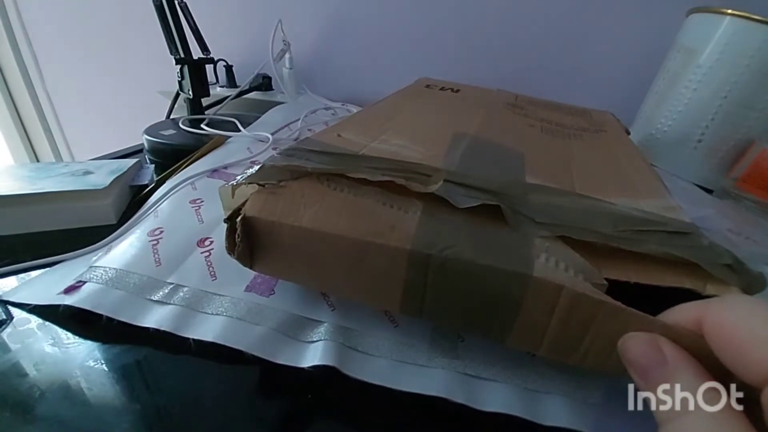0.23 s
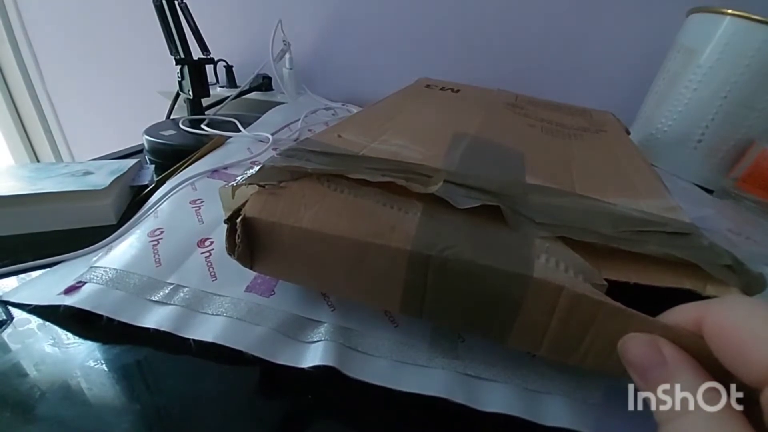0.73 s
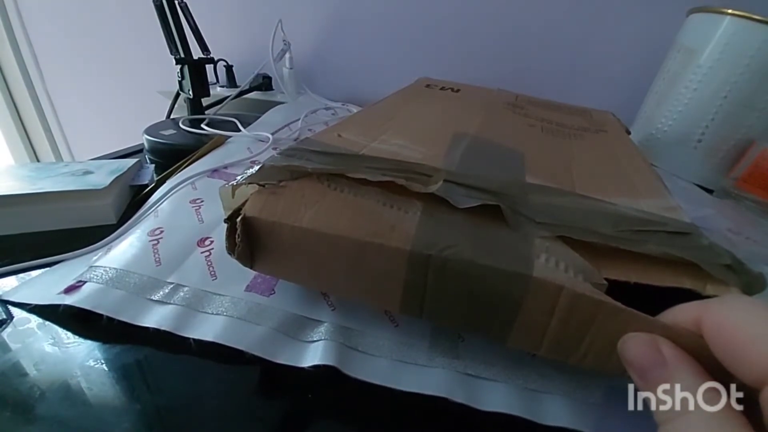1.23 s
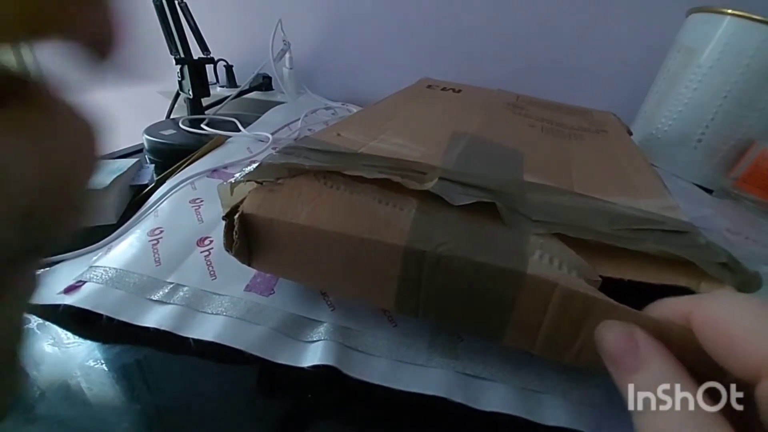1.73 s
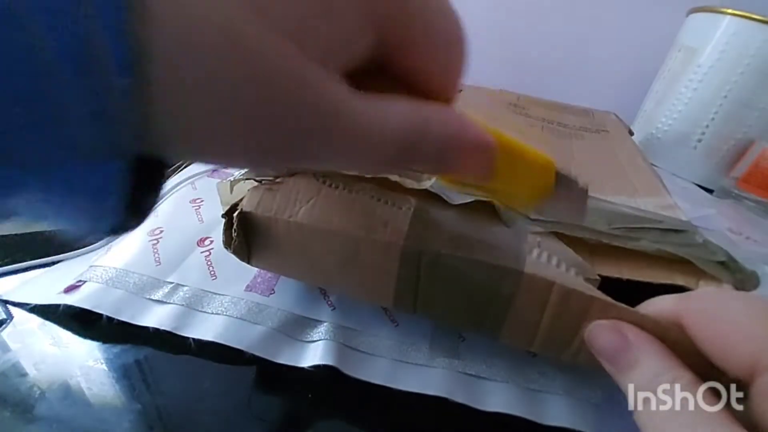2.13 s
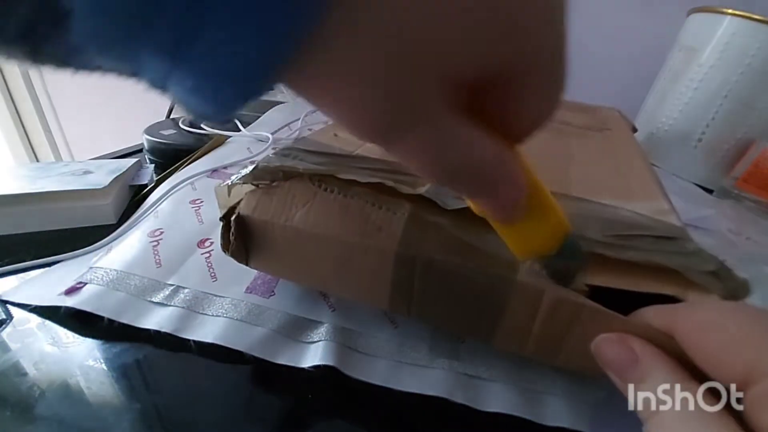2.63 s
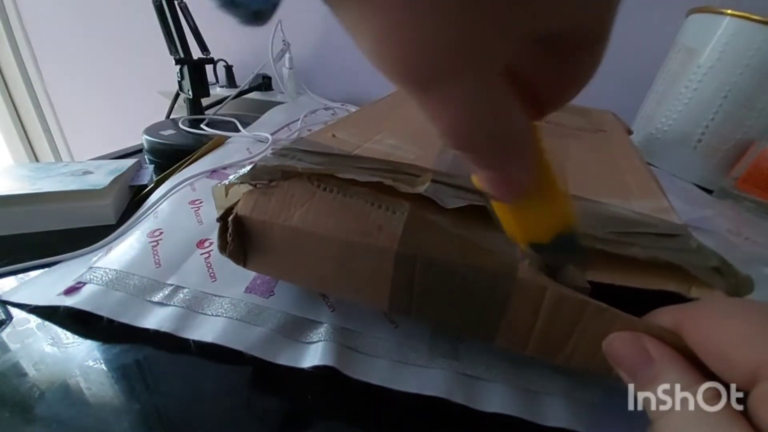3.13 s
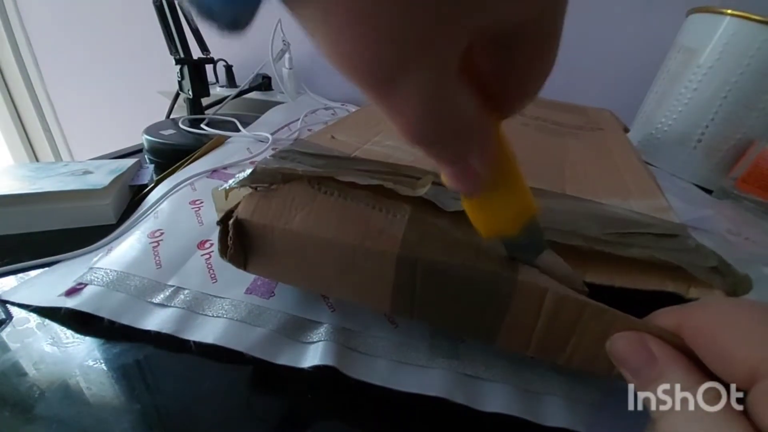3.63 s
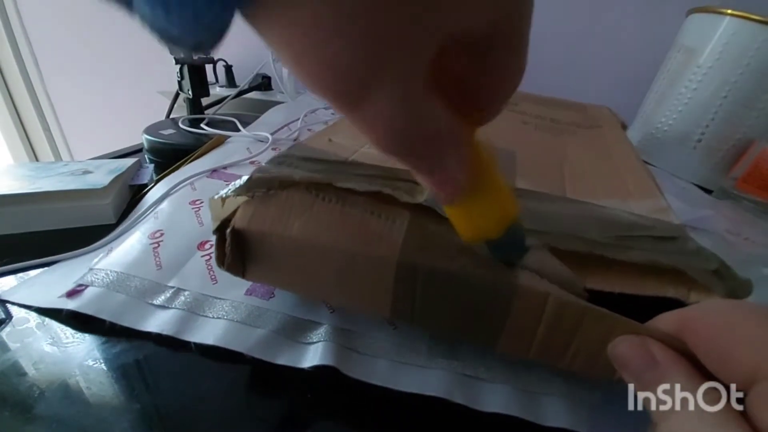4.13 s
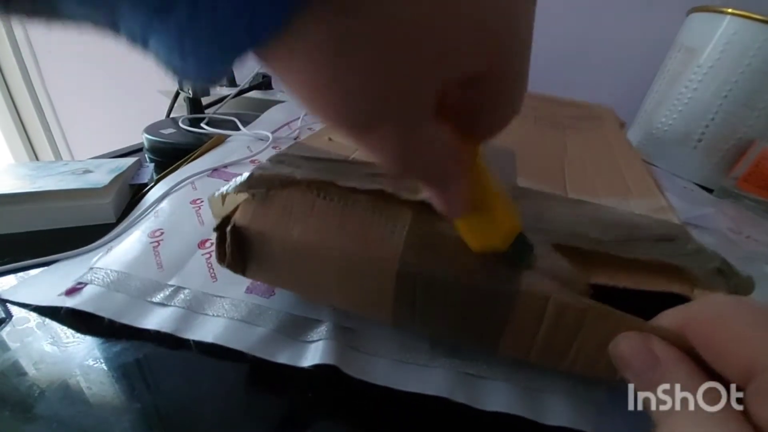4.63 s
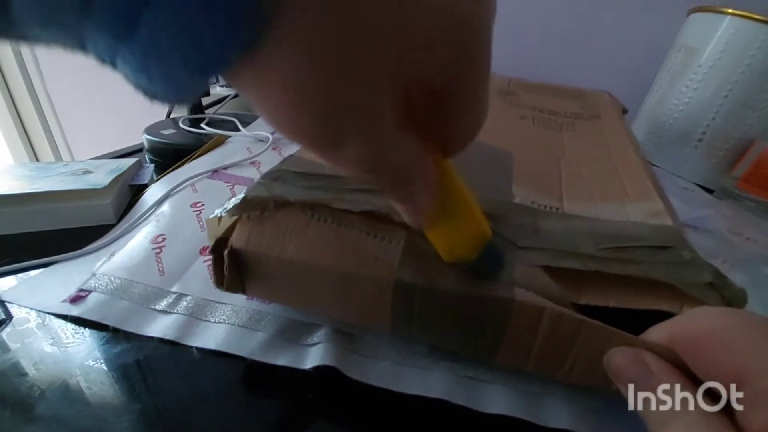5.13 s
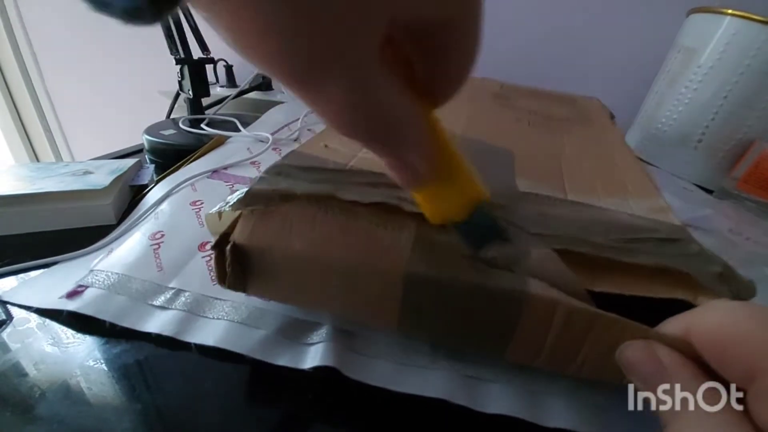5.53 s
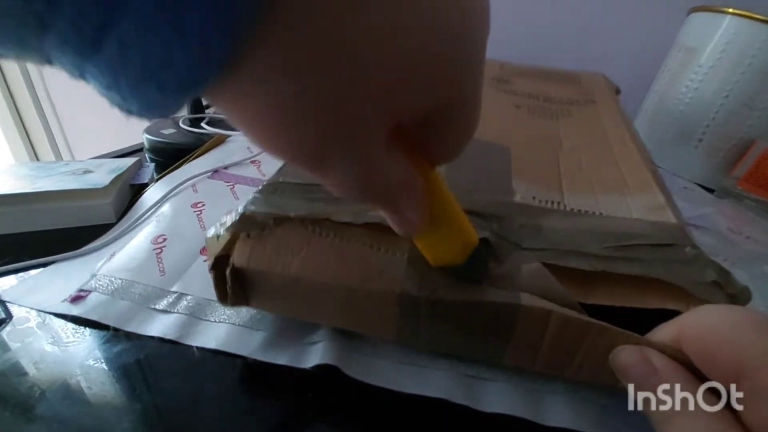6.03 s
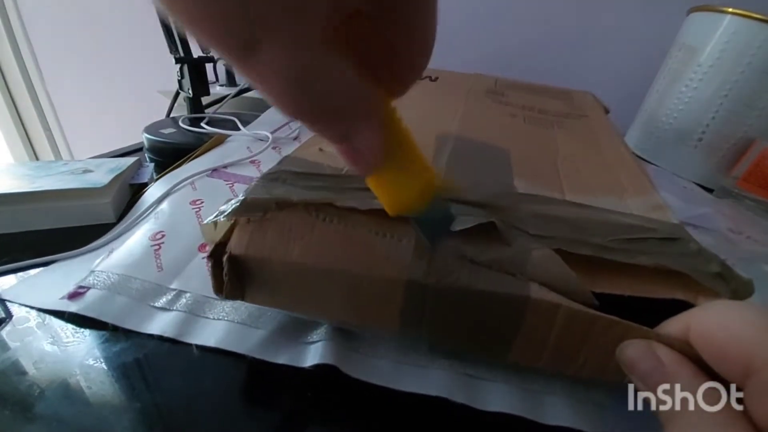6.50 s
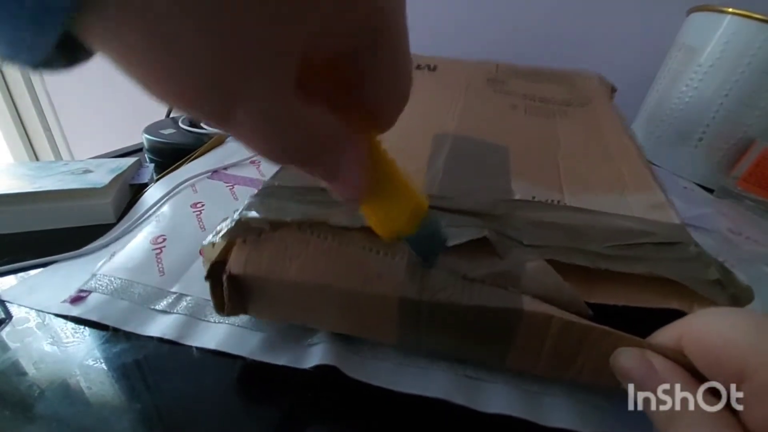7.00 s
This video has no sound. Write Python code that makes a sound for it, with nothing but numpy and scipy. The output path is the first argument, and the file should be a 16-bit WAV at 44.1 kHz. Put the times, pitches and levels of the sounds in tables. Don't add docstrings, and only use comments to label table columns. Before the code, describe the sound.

Very close in a small furnished room, a plastic cutter's slider clicks in uneven clusters, hollow and slightly to the left, ending in a louder snap. After a short near-silence, the blade saws taped cardboard in irregular strokes. A loud crack with a boxy thump breaks out, then rasping fibres, crisp tape ticks and hollow carton knocks continue over faint air hiss.

```python
import sys
import numpy as np
from scipy import signal
from scipy.fft import rfft, irfft
from scipy.io import wavfile

SR = 44100
rng = np.random.default_rng(int(sys.argv[2]) if len(sys.argv) > 2 else 0)


def to_linear_factor(level_db):
    exponent = np.asarray(level_db, float) / 20
    return 10 ** exponent


def wav_record(signal):
    frames = np.transpose(np.atleast_2d(signal))
    bounded = np.clip(frames, -1, 1)
    quanta = np.round(bounded * 32767).astype(np.int16)
    wavfile.write(sys.argv[1], SR, quanta)


N = 320166

# start in [s], handle peak in [dB], blade tick above it in [dB], snap length in [ms].
NOTCHES = [(0.0058, -39, 8, 2.5), (0.0549, -31.5, -6, 2.1), (0.067, -20, 5.5, 3), (0.1133, -26.5, 12, 2.1),
           (0.1266, -28, 2, 3.7), (0.1425, -37.5, 11, 2.1), (0.2958, -58, -17, 1.6),
           (0.3124, -33.5, -0.5, 2.8), (0.3222, -26.5, 11, 3.05), (0.3411, -38, 7.5, 2.9),
           (0.4522, -39.5, -7.5, 1.8), (0.4616, -50, -14, 2.2), (0.4937, -48, -12, 4.5),
           (0.5035, -28, -5.5, 3), (0.5714, -53, -13, 2.5), (0.6272, -47.5, -16, 2.5),
           (0.6539, -58, -18, 2.1), (0.6674, -48, -13, 2.5), (0.697, -45.5, -18, 2.2),
           (0.7234, -54, -18, 2.8), (0.7936, -43, -7, 2.3), (0.8223, -37, -16, 1.4),
           (0.8433, -57, -28, 1.8), (0.8829, -45, -5, 2), (0.8937, -38.5, -8, 2.3), (0.9703, -53, -13, 2.2),
           (0.9965, -27, -1, 2.6), (1.0103, -31, -8.5, 2.2), (1.0185, -22, -2, 3.3), (1.0374, -46, -5.5, 2),
           (1.1526, -37, -4.5, 1.8), (1.1609, -41.5, -24, 1.6), (1.2459, -42.5, -9.5, 2.8),
           (1.2855, -48, -20, 2.5), (1.2926, -41, -17, 2), (1.4448, -37.5, -18, 2.2),
           (1.5975, -33.5, -18, 3.7), (1.6508, -24.5, -15, 3.5), (1.6635, -25.5, 2.5, 2.1),
           (1.672, -15.5, -20.5, 2.5), (1.6839, -11, -17, 1.7), (1.711, -43, -23, 2.2),
           (1.7363, -31, -28.5, 2.5), (1.7709, -53, -6, 2), (1.7976, -27, -15.5, 1.8), (1.8232, -51, -4, 2),
           (1.8404, -41, -10, 2.3), (1.847, -46, 1, 2.5), (1.8807, -47, 2, 2.2), (1.8911, -48, 3.5, 2.5)]
# time in [s], creak level in [dB].
GRIP_CREAK = [
    (0.0, -71),
    (0.112, -52),
    (0.33, -73),
    (0.538, -63),
    (0.714, -70.5),
    (0.818, -74),
    (1.126, -72),
    (1.41, -67),
    (1.572, -67.5),
    (1.7, -55),
]
# frequency in [Hz], width in [Hz], level in [dB].
HANDLE_MODES = [(1855, 360, -6), (2260, 280, -1.5), (2546, 220, -3.5), (3246, 300, -9.5),
                (4176, 940, -15.5), (5900, 350, -10)]
# frequency in [Hz], density in [dB per Hz].
BLADE_SPECTRUM = [(2350, -28), (4000, -12.5), (5920, -5), (8490, -9.5), (9560, -4.5), (12900, -5.5),
                  (15600, -5.5), (16500, -22)]


def knife():
    start, handle_db, tick_db, ms = np.transpose(NOTCHES)
    blade_db = handle_db + tick_db
    jolt = ports(0.89, lead=22)
    creak = curve(GRIP_CREAK)[0] * (0.5 + 0.5 * slips(160, 2.7, 2))

    handle_push = bursts(start, handle_db + 6, ms, rise=0.31) + creak
    handle = ring(jolt * handle_push, HANDLE_MODES)

    blade_push = bursts(start, blade_db + 4, 1.29 * ms, rise=0.2) + creak
    blade = colour(jolt * blade_push, BLADE_SPECTRUM)

    latch = bursts(start, 1.65 * blade_db - 6.5, np.full_like(ms, 0.7))
    hand = signal.butter(1, [45, 900], "bandpass", fs=SR, output="sos")
    thud = signal.sosfilt(hand, latch)
    return handle * pan(14.4) + blade * pan(11) + thud * pan(3.6)


# start in [s], fibre snap in [dB], tape tick in [dB], carton knock in [dB].
BREAKS = [(2.1102, -32, -44, -27.5), (2.2292, -44.5, -35, -54.5), (2.3524, -22, -42.5, -31.5),
          (2.5107, -38, -50, -29.5), (2.5532, -48.5, -27, -43), (2.5662, -37, -38, -43),
          (2.819, -46, -43, -45.5), (3.1133, -52, -41.5, -55), (3.217, -21, -3.5, -7.5),
          (3.2337, -18, -13.5, -10), (3.2477, -22, -17.5, -27), (3.2673, -24.5, -22.5, -34),
          (3.2737, -30, -22.5, -34), (3.293, -35, -33, -36.5), (3.3351, -45, -37.5, -42.5),
          (3.4208, -37, -34, -44), (3.4554, -32, -36, -33), (3.6556, -31.5, -33.5, -37.5),
          (3.6727, -31, -23, -25.5), (3.6834, -27, -13.5, -25.5), (3.7429, -33.5, -25.5, -22.5),
          (3.7469, -33.5, -30, -34.5), (3.7684, -40, -39, -44), (3.805, -46, -46, -51),
          (3.8863, -46, -33.5, -42.5), (3.9103, -38, -31, -41.5), (3.9579, -24.5, -29, -27.5),
          (3.9644, -23.5, -28.5, -29), (4.088, -29, -31, -41), (4.1037, -54, -40.5, -50.5),
          (4.1458, -39.5, -33.5, -29.5), (4.1774, -45.5, -32.5, -42), (4.1896, -43, -32.5, -40.5),
          (4.1949, -35.5, -29, -36.5), (4.2477, -45, -28, -48.5), (4.3002, -34, -32, -35.5),
          (4.3608, -43, -60, -56), (4.4423, -64, -47, -69), (4.4824, -66, -40, -59.5),
          (4.515, -52, -50, -69), (4.5712, -46, -48.5, -63), (4.5814, -36.5, -31.5, -62.5),
          (4.6308, -32, -27.5, -41), (4.6451, -43, -37, -35), (4.6958, -39.5, -26, -35.5),
          (4.8389, -35, -36.5, -37.5), (4.8566, -26, -29, -25.5), (4.868, -39, -30, -34.5),
          (4.8829, -42, -29, -48), (4.9018, -46.5, -29.5, -54), (4.9201, -24, -26.5, -38),
          (4.9661, -45, -37.5, -51), (4.9868, -48, -29, -48.5), (5.0068, -32.5, -32.5, -34),
          (5.0689, -30, -29, -25), (5.0842, -24, -22.5, -17.5), (5.1055, -35, -28, -42),
          (5.163, -26, -29.5, -27.5), (5.173, -47, -51, -32), (5.2177, -41.5, -35.5, -41),
          (5.2352, -38, -38.5, -45), (5.2687, -54, -36, -62), (5.31, -49, -58, -66),
          (5.3707, -34.5, -42, -45.5), (5.3857, -31, -44, -43), (5.3983, -42, -40, -43),
          (5.4125, -40, -29, -36), (5.444, -20, -30, -28.5), (5.52, -29, -20.5, -29.5),
          (5.5508, -24.5, -18, -15.5), (5.588, -41, -21, -42.5), (5.6359, -35, -40.5, -49),
          (5.694, -33, -32, -39), (5.7054, -46, -37, -40.5), (5.7225, -45.5, -39.5, -35),
          (5.7678, -35, -18.5, -47.5), (5.8566, -33, -24, -21), (5.8693, -26.5, -15.5, -24.5),
          (5.8775, -31, -19.5, -24.5), (5.9202, -34, -36, -42), (5.9314, -26.5, -20.5, -34),
          (5.9385, -46, -27.5, -28), (5.958, -36, -34, -35.5), (5.9846, -44, -40, -45),
          (6.1047, -36, -34.5, -36), (6.11, -30.5, -37, -34.5), (6.1875, -33, -36, -36),
          (6.3469, -37.5, -35.5, -34), (6.374, -47, -37, -45), (6.3978, -32, -32, -24),
          (6.4214, -50, -32.5, -30.5), (6.4429, -49, -38.5, -35), (6.4714, -30.5, -33, -31),
          (6.517, -29.5, -32.5, -27.5), (6.5877, -45, -40.5, -53), (6.7349, -50, -45, -54),
          (6.7927, -57, -51, -45), (6.8267, -31, -52, -81), (6.8679, -51, -46, -70),
          (6.8825, -53, -41, -70), (6.9579, -47, -31, -48.5), (7.0275, -29.5, -40, -43),
          (7.042, -37, -33.5, -37.5), (7.1232, -48, -37, -52.5)]
# frequency in [Hz], width in [Hz], level in [dB].
CARTON_MODES = [(242, 36.3, 0.5), (326, 49.7, 1.5), (427, 50, -1), (516.6, 129, -7)]
# frequency in [Hz], width in [Hz], level in [dB].
WALL_MODES = [(773, 110, 1.5), (979, 106, 2), (1248, 215, -0.5), (1789, 460, -0.5), (2040, 720, -5.5),
              (3266, 540, -8.5)]
# frequency in [Hz], density in [dB per Hz].
FIBRE_SPECTRUM = [(1500, -16), (2600, 0), (3400, 2), (5000, 1), (7000, -8.5), (9000, -13), (16500, -28.5)]
# frequency in [Hz], density in [dB per Hz].
TAPE_SPECTRUM = [(4000, -9.5), (6800, -1.5), (8500, -5), (12500, -2), (15400, -2.5), (16500, -27.5)]


def cracks():
    start, fibre_db, tape_db, knock_db = np.transpose(BREAKS)
    ms = 1.42 + 0.035 * (knock_db + 41)
    jolt = ports(0.51, lead=blade_lead())

    knock = ports(0.9, lead=4.2) * bursts(start, knock_db + 4, 2.09 * ms, rise=0.23)
    body = ring(knock, WALL_MODES) + to_linear_factor(-4) * ring(knock, CARTON_MODES)

    fibre = colour(jolt * bursts(start, fibre_db + 2.5, 1.2 * ms, rise=0.29), FIBRE_SPECTRUM)
    tape = colour(jolt * bursts(start, tape_db + 5, 0.8 * ms, rise=0.2), TAPE_SPECTRUM)
    return (fibre + tape) * pan(2) + body * pan(3.1)


# time in [s], carton boom in [dB], wall rasp in [dB], desk thump in [dB].
STROKE_LEVELS = [(1.3, -78, -83, -78), (1.35, -78, -70, -77), (1.63, -81, -88, -83),
                 (1.66, -57.5, -44.5, -65), (2.01, -79, -57.5, -78), (2.13, -53, -56.5, -63),
                 (2.28, -81, -80, -75), (2.38, -37.5, -32, -54), (2.44, -58, -73, -80),
                 (2.49, -36.5, -39, -50), (2.61, -43, -71, -58), (2.66, -37, -35, -55),
                 (2.76, -44.5, -59, -58), (3.11, -56.5, -49.5, -70), (3.14, -27, -36, -58),
                 (3.19, -48, -55.5, -49), (3.22, -14, -22, -30.5), (3.36, -55, -64.5, -59.5),
                 (3.52, -39.5, -38.5, -54.5), (3.62, -63, -71, -78), (3.69, -28, -32.5, -55.5),
                 (3.72, -46, -43.5, -54), (3.76, -36, -50, -42), (3.86, -78, -74, -82),
                 (3.97, -31.5, -31.5, -48.5), (4.1, -62, -64.5, -91), (4.22, -41, -40.5, -52),
                 (4.4, -82, -80.5, -77), (4.49, -47, -80.5, -60.5), (4.54, -79, -75.5, -82.5),
                 (4.7, -40.5, -36.5, -52), (4.8, -59, -51, -65), (4.87, -52, -45.5, -61),
                 (4.94, -64.5, -56, -65.5), (5.1, -32, -31.5, -40.5), (5.35, -72.5, -80, -80),
                 (5.45, -48.5, -39, -61.5), (5.53, -46, -40, -54), (5.55, -27, -43, -66),
                 (5.63, -60, -67, -68), (5.78, -52.5, -46, -61), (5.88, -23, -38, -32),
                 (5.96, -44, -51, -46), (6.03, -67, -68, -79), (6.13, -39, -44.5, -54.5),
                 (6.3, -70, -64.5, -78), (6.41, -36.5, -55, -40.5), (6.49, -60, -57, -56),
                 (6.53, -32.5, -53, -45.5), (6.64, -77, -76, -67), (6.98, -66, -64, -72),
                 (7.19, -36.5, -42, -35), (7.26, -41, -33.5, -48)]
# time in [s], fibre tearing in [dB], tape hiss above it in [dB].
EDGE_LEVELS = [(1.7, -66.5, 4.5), (1.76, -59, -1.5), (1.85, -61.5, 5.5), (2.1, -69, -1), (2.3, -73.5, -6.5),
               (2.4, -70, 29.5), (2.44, -66.5, -18.5), (2.55, -53.5, 2.5), (2.85, -64, 5.5),
               (2.89, -71.5, -15), (2.95, -59.5, 13.5), (3.11, -56.5, -2.5), (3.2, -57.5, 14.5),
               (3.23, -56.5, 36.5), (3.37, -59.5, -15.5), (3.46, -61.5, 15.5), (3.54, -62.5, 13.5),
               (3.6, -65, -21.5), (3.68, -66, 30), (3.77, -66.5, 13), (3.84, -71, -11), (3.98, -60, 22.5),
               (4.05, -58.5, -4), (4.07, -63.5, -28.5), (4.08, -58.5, 0.5), (4.13, -58, 5), (4.26, -67, 18),
               (4.39, -80, -9), (4.61, -72.5, 21.5), (4.73, -55, 7.5), (4.81, -50, -9.5), (4.86, -56.5, 4),
               (5.03, -50, 0.5), (5.08, -48, 13), (5.23, -62, 12), (5.29, -71, -12.5), (5.31, -68.5, 16),
               (5.35, -67.5, -8), (5.4, -60.5, 15.5), (5.59, -58, 3), (5.63, -57, -8), (5.93, -54, 22),
               (6.03, -63.5, -29), (6.07, -57.5, 5), (6.19, -63.5, 14), (6.27, -60.5, -17.5),
               (6.35, -61, 5), (6.53, -73, 7), (6.62, -72.5, -7), (6.76, -69, 16), (6.84, -75, 4.5),
               (6.95, -68.5, 12.5), (7.14, -54.5, 3.5), (7.26, -47.5, 13)]
# frequency in [Hz], width in [Hz], level in [dB].
DESK_MODES = [(62, 33, -2.5), (92, 39, 0), (132.7, 50, -2.5)]


def sawing():
    boom, rasp, thump = curve(STROKE_LEVELS)
    tearing, bright = curve(EDGE_LEVELS)
    catch = slips(81, 4.6, 6.7)
    fine = slips(270, 1.8, 1)

    carton = boom * ring(ports(0.7, lead=0.96) * (0.77 + 0.61 * catch), CARTON_MODES)
    walls = rasp * ring(ports(0.58, lead=2.3) * (0.5 + 0.5 * catch + 0.27 * fine), WALL_MODES)
    desk = thump * ring(ports(0.79, lead=0) * (0.76 + 0.5 * catch), DESK_MODES)

    drag = tearing * ports(0.3, lead=blade_lead())
    fibre = colour(drag * (0.39 + 0.49 * catch + 0.2 * fine), FIBRE_SPECTRUM)
    tape = colour(drag * bright * (0.5 + 0.98 * catch + 0.29 * fine), TAPE_SPECTRUM)

    low = to_linear_factor(-3) * carton * pan(0.6) + to_linear_factor(2.5) * desk * pan(2.6)
    return low + to_linear_factor(3) * walls * pan(2.5) + to_linear_factor(-0.5) * (fibre + tape) * pan(1.4)


def blade_lead():
    return np.interp(np.arange(N) / SR, [2.6, 3.2, 4.8, 7.2], [-1, 2, 4, 5])


def bursts(start, db, ms, rise=0.15):
    env, t = np.zeros(N + 2048), np.arange(2048) / SR
    first = (start * SR).astype(int)
    decay = np.clip(ms, 0.15, 9) / 1000
    for i, gain, tau in zip(first, to_linear_factor(db), decay):
        env[i:i + 2048] += gain * np.exp(-t / tau) * (1 - np.exp(-t / (rise * tau)))
    return env[:N]


def slips(rate, spread_db, ms):
    happens = rng.random(N) < rate / SR
    size = happens * to_linear_factor(spread_db * np.minimum(rng.exponential(size=N), 3.5))
    return unit(signal.lfilter([1], [1, -np.exp(-1000 / (ms * SR))], size))


def ring(x, modes):
    total, power = 0, 0
    for k, (hz, width, db) in enumerate(modes):
        b, a = signal.iirpeak(hz, hz / width, fs=SR)
        total = total + (-1) ** k * to_linear_factor(db) * signal.lfilter(b, a, x)
        power += to_linear_factor(2 * db) * width
    return total / np.sqrt(power * np.pi / SR)


def colour(x, spectrum):
    hz, db = np.transpose(spectrum)
    f = np.fft.rfftfreq(N, 1 / SR) + 1
    gain = unit(to_linear_factor(np.interp(np.log(f), np.log(hz), db)))
    return irfft(rfft(x) * gain, N)


def ports(alike, lead):
    same, own = noise(N), noise(2, N)
    late = same[np.clip(np.arange(N) - np.round(lead).astype(int), 0, N - 1)]
    return np.sqrt(alike) * np.array([same, late]) + np.sqrt(1 - alike) * own


def pan(db):
    return to_linear_factor(np.array([[db], [-db]]) / 2)


def curve(table):
    s, *columns = np.transpose(table)
    t = np.arange(N) / SR
    return [to_linear_factor(np.interp(t, s, c, left=-120, right=-120)) for c in columns]


def noise(*shape):
    return rng.standard_normal(shape)


def unit(x):
    return x / np.sqrt(np.mean(x ** 2))


# frequency in [Hz], time to fall 60 dB in [s].
REVERB_TIME = [(60, 0.27), (500, 0.18), (2500, 0.18), (8000, 0.13), (16000, 0.18)]


def room(x, wet_db, side_db):
    t, tail = np.arange(SR // 2) / SR, 0
    hz, t60 = np.transpose(REVERB_TIME)
    for f in 60 * 2 ** np.arange(0, 8.1):
        edges = [f / np.sqrt(2), min(f * np.sqrt(2), 21000)]
        band = signal.butter(2, edges, "bandpass", fs=SR, output="sos")
        fade = np.exp(-np.log(1000) * t / np.interp(np.log(f), np.log(hz), t60))
        apart = min(f / 1900, 1) ** 0.5
        echoes = apart * noise(2, len(t)) + (1 - apart) * noise(len(t))
        tail = tail + signal.sosfilt(band, echoes) * fade
    tail = tail * np.clip(t / 0.0047 - 0.4, 0, 1)
    tail = tail / np.sqrt(np.sum(tail ** 2) / 2)
    wet = signal.fftconvolve(x.mean(0)[None], tail, axes=1)[:, :N]
    return x + to_linear_factor(wet_db) * pan(side_db) * wet


# frequency in [Hz], density in [dB per Hz].
AIR_SPECTRUM = [(15, -30.5), (25, -1), (74, 0.5), (187, -4.5), (313, -2), (634, -16), (854, -15.5),
                (2210, -24), (10700, -15), (15200, -21), (16500, -35)]


def still_air():
    return to_linear_factor(-70.5) * colour(ports(0.18, lead=0), AIR_SPECTRUM)


def scene():
    parcel = cracks() + sawing()
    return room(knife(), wet_db=-8, side_db=2) + room(parcel, wet_db=-12, side_db=1) + still_air()


def roll_off(x):
    return signal.sosfilt(signal.butter(12, 16960, fs=SR, output="sos"), x)


def record(dry):
    top = signal.ellip(8, 0.2, 60, 16900, fs=SR, output="sos")
    mix = signal.sosfilt(top, np.clip(dry, -0.95, 0.95))
    return roll_off(mix)


dry = scene()
out = record(dry)
wav_record(out)
```